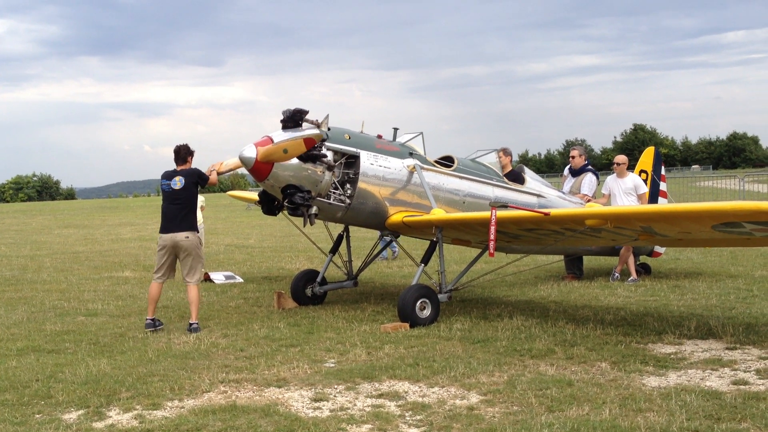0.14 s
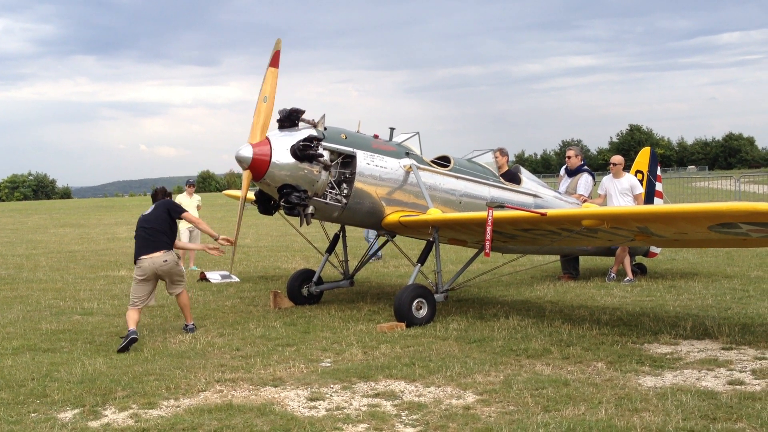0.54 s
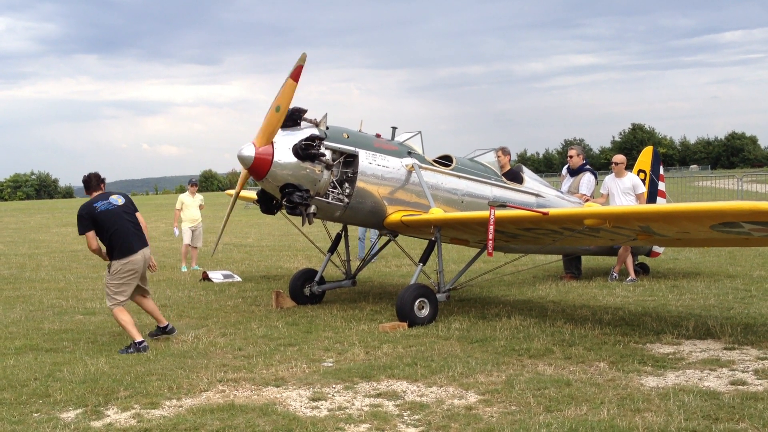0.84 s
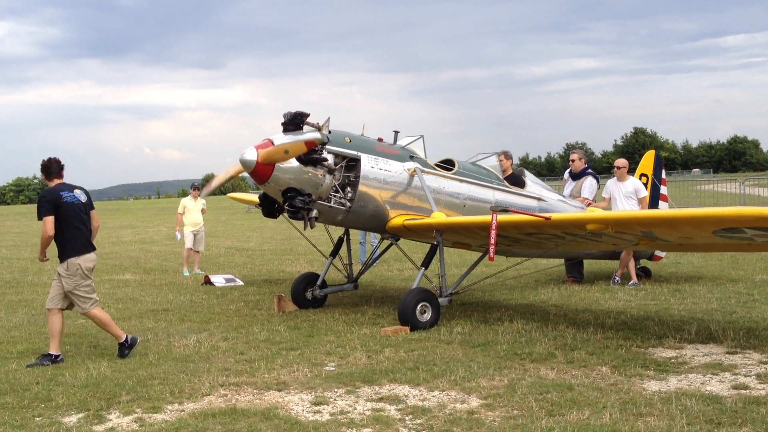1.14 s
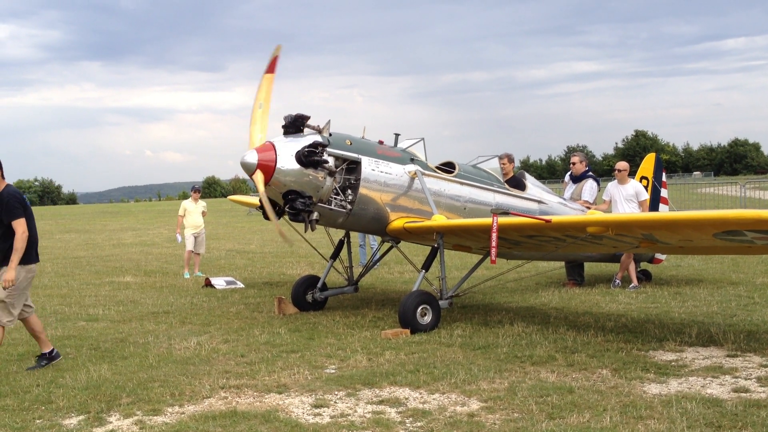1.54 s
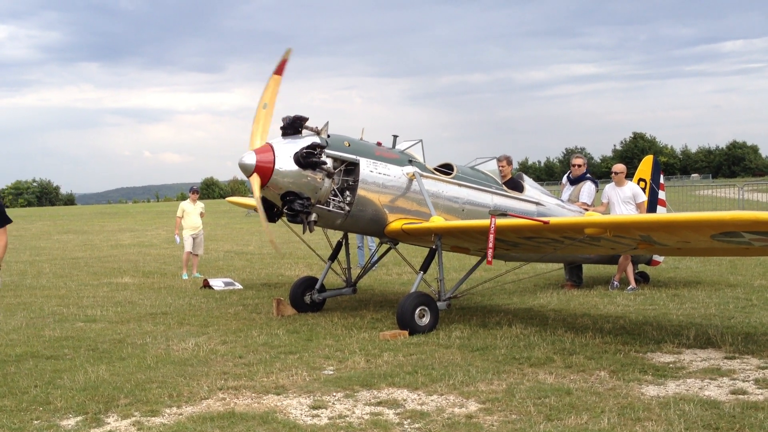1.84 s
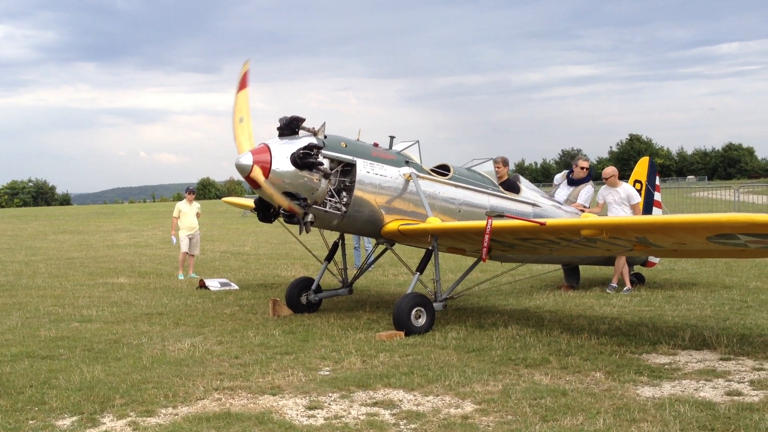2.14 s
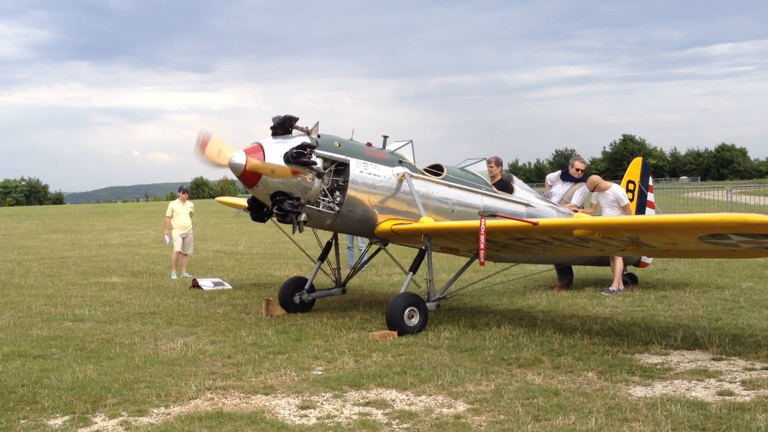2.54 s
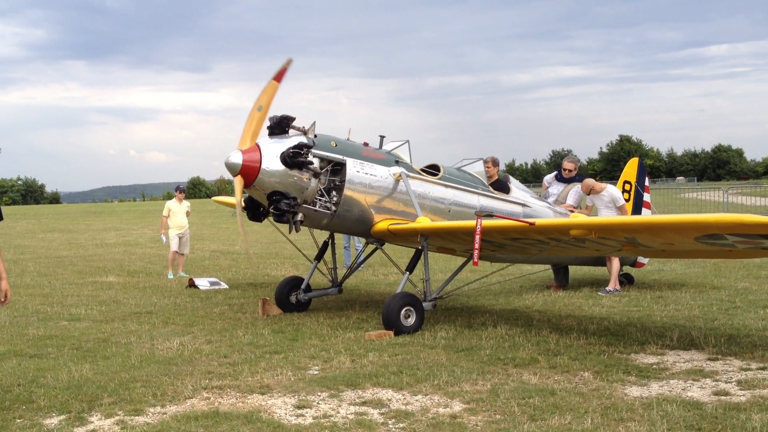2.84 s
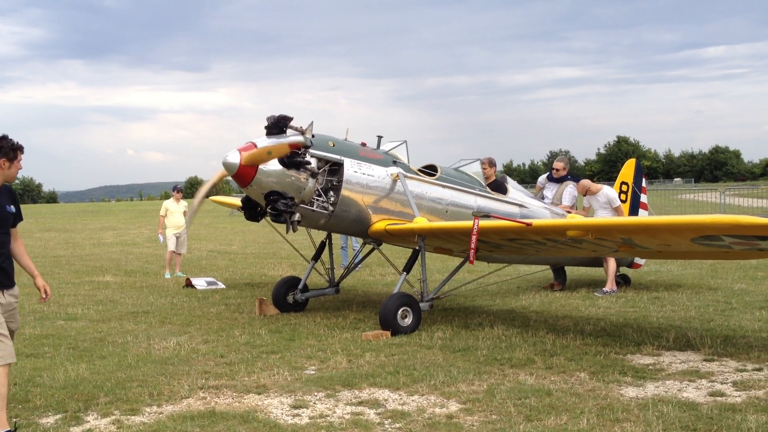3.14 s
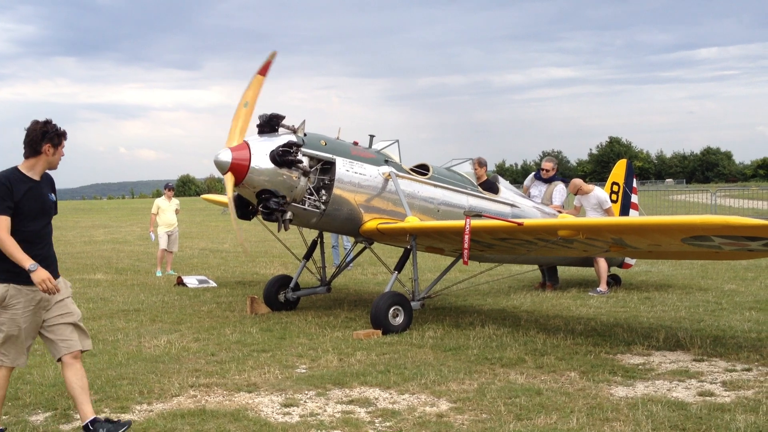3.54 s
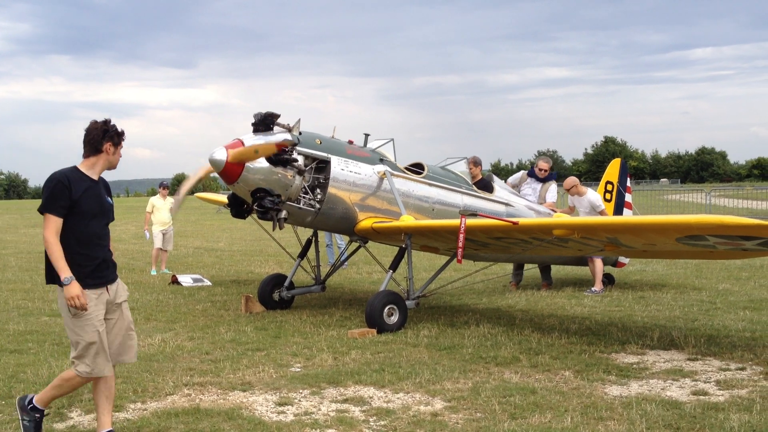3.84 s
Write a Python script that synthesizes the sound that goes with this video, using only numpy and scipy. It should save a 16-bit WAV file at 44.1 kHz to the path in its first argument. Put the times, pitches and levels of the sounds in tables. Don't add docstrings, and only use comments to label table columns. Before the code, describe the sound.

A small radial aircraft engine is hand-swung, clanks, catches unevenly and settles into a hissy popping idle

```python
import sys
import numpy as np
from scipy import signal
from scipy.fft import rfft, irfft
from scipy.io import wavfile
from scipy.ndimage import uniform_filter1d

SR = 44100
rng = np.random.default_rng(int(sys.argv[2]) if len(sys.argv) > 2 else 0)


def invert_db(x):
    u = np.asarray(x, float) / 20
    return 10 ** u


def store_pcm(level_fs):
    pcm = np.round(np.clip(level_fs, -1, 1) * 32767).astype(np.int16)
    wavfile.write(sys.argv[1], SR, np.atleast_2d(pcm).T)


N = 176400

# [f/Hz, density/dB]
FIELD_SPECTRUM = [(24, -57), (40, -23), (162, -4), (255, -5.5), (319, -10), (890, -26), (10100, -40),
                  (14700, -41), (15800, -48)]
# [t/s, level/dB, f/Hz, swell/s]
THUDS = [(0.052, -52, 162, 0.013), (0.102, -50.5, 248, 0.0078), (0.166, -43, 232, 0.0059),
         (0.194, -46, 143, 0.01), (.205, -45, 252, 0.0081), (0.279, -53, 163, 0.014),
         (.31, -51.5, 245, 0.011), (.34, -45, 162, 0.0073), (.38, -49, 150, 0.0067),
         (0.476, -41, 152, 0.0055), (.56, -53, 258, 0.01), (0.594, -54, 137, 0.011),
         (.81, -52.5, 157, 0.013), (1.061, -46.5, 101, 0.043), (1.249, -22, 176, 0.0033)]
RATTLE_S = (.5, .7, .9, .96, 1.08)
RATTLE_DB = (-62, -57, -56.5, -50, -36.5)
# [t/s, length/s, level/dB, tilt/dB per
WHEEZES = [(0.494, 0.025, -53, 3), (0.609, 0.047, -55, -5), (0.63, 0.042, -57, 3), (.727, 0.0074, -55, -2),
           (0.68, 0.054, -54.5, -4), (0.81, 0.042, -54.5, -5), (0.828, 0.027, -48, 3.5),
           (0.862, 0.069, -60, -1), (0.909, 0.048, -37.5, -0.5), (0.949, 0.05, -43.5, -6),
           (0.92, .008, -39, -5), (1.028, 0.011, -48, -7), (.773, .012, -58, -6), (.87, 0.0079, -55, -8),
           (0.95, .008, -50, -8), (1.211, 0.029, -31, -5), (1.149, 0.026, -23, 0.5), (1.012, .04, -62, 0)]
# [t/s, level/dB, f/Hz, t60/s]
CLANKS = [(.5, -46.5, 570, 0.12), (.559, -45, 520, 0.096), (.615, -43, 570, 0.072),
          (.686, -30.5, 505, 0.094), (.727, -47, 620, 0.065), (.775, -43, 570, 0.055),
          (.845, -46, 640, .08), (.915, -30, 1130, 0.062), (.918, -33, 2100, 0.11),
          (.922, -38, 4210, 0.066), (.7, -42, 516, .09), (.69, -42, 760, 0.055), (.685, -44, 1100, .05),
          (1.03, -42, 1000, .05), (1.263, -9, 2250, .045), (1.08, -16, 5100, 0.063),
          (1.16, -18, 1710, 0.06), (1.466, -18, 4300, 0.034), (1.85, -19, 660, 0.072),
          (.953, -33, 598, 0.095), (.985, -28, 577, 0.042), (1.031, -33, 620, 0.052),
          (1.056, -30, 245, 0.12)]
# times [t/s], pitches [f/Hz] and levels [level/dB]
SQUEAK_S = (.53, .6, .675)
SQUEAK_HZ = (4300, 7350, 7400)
SQUEAK_DB = (-82, -65, -62)
# [t/s, peak level/dB, whistle f/Hz, extra tilt/dB per octave, stretch/1]
CATCH = [(1.0766, -3.5, 1155, 2, 0.97), (1.1549, -7.5, 1110, 0.5, 0.97), (1.2204, -7, 4080, 0.8, 0.97),
         (1.262, -4, 6680.0, -0.5, 0.94), (1.3159, -10, 2200.0, -0.2, 0.97), (1.3553, -8, 2060, -0.1, 0.97),
         (1.3935, -15.5, 2220, 0.3, 1.0), (1.4371, -17.5, 7670.0, -0.5, 0.93),
         (1.4683, -6, 2160, 1.1, 0.97), (1.506, -11.5, 1640.0, 2, 1.0), (1.5388, -8, 7700, -0.1, 0.96),
         (1.5703, -15.5, 4540.0, -1.5, 1.0), (1.6061, -19, 4170, 1.2, 0.88), (1.633, -5, 2230, 1, 0.96),
         (1.6677, -12, 7000, -0.5, 0.99), (1.699, -4.5, 1050, -1.3, 0.87), (1.725, -22, 2250, 3, 1.0),
         (1.7608, -27, 2150, 4, 1.0), (1.7874, -5, 6400, -0.5, 0.96), (1.8196, -20, 1230.0, -3, 0.88),
         (1.8488, -5.5, 7150, 0, 0.97), (1.8791, -24, 1820, -3, 1.0), (1.9145, -19, 3230.0, -4, 0.95)]
IDLE_S = [1.937, 2.229, 2.517, 2.801, 3.081, 3.360, 3.640, 3.921, 4.202]
# [t/s, peak level/dB, whistle f/Hz, extra tilt/dB per octave]
NEAR_STACKS = [(1.9359, -5.5, 4080, 0.2), (1.9974, -11, 8290.0, -2.8), (2.0852, -7.5, 4480, 0.2),
               (2.1442, -9, 2070, 0), (2.2285, -8, 6450, -1), (2.2903, -10, 2810, -1),
               (2.374, -7, 6740, 0.2), (2.4325, -10.5, 4390.0, -0.6), (2.516, -7.5, 4250, -0.5),
               (2.577, -7.5, 6300, -0.8), (2.6601, -5, 1040, -0.0), (2.7181, -9, 3970, -2.2),
               (2.801, -7, 5770.0, -1), (2.8595, -11, 4040, -2), (2.9406, -8, 3790, -1.3),
               (2.9979, -11, 7490.0, -2), (3.0811, -8, 2366, -1.5), (3.1385, -9.5, 4200, 0.8),
               (3.2194, -7.5, 6570, -1.7), (3.2776, -11.5, 6360, -2.5), (3.36, -9.5, 6920, -1.8),
               (3.4182, -8.5, 4300, -0.5), (3.5004, -7, 4370, 0.8), (3.5573, -10, 4160, -2.2),
               (3.6394, -9, 4710, 2), (3.698, -10.5, 6500.0, 0.5), (3.7785, -7, 7620.0, -0.2),
               (3.8406, -7.5, 6570, -0.8), (3.92, -5, 6750, -0.5), (3.9783, -7, 8380.0, -2.7)]
# [place in cycle/0-1, puff level/dB, puff tilt/dB per octave]
CYLINDERS = [
    (0., -7, 1.8),
    (.213, -19, 1.2),
    (0.414, -8, 1.7),
    (.605, -27, 0.6),
    (.825, -29.5, -1),
]
# [lag/s, level/dB, f/Hz, swell/s]
PIPES = [
    [(-.010, -8, 273, 0.0087), (0.001, -6.5, 224.5, 0.0077)],
    [(-0.0166, -12, 125.5, 0.011), (-.015, -2.5, 176, .012), (.0015, -4.5, 251, 0.0031),
     (0.012, -1, 613, 0.0016), (0.0032, -12, 560, 0.0011)],
    [(-.006, -3, 251.6, 0.0049), (0.01177, -9, 132.3, 0.0086), (.008, -2.5, 210, 0.0018),
     (-0.0071, -10, 661, 0.0044)],
    [(-.010, -6, 176, 0.011), (.007, -9.5, 226.5, 0.006)],
    [(-.004, -5, 242, 0.0021), (0.0023, -7.5, 133, 0.0045), (-0.0032, -17, 603, 0.0027)],
]
# [t/s, level/dB]
LOAD = [
    (1.06, -43.5),
    (1.18, -35.5),
    (1.26, -35.5),
    (1.3, -40.5),
    (1.7, -34),
    (3.72, -28),
    (4.0, -29),
]
# [f/Hz, density/dB]
PUFF_SPECTRUM = [(130, -45), (300, -16.5), (800, -13.5), (1900, -2), (5200, -3), (8200, -4.5), (9500, -12),
                 (14000, -12.5)]
# [f/Hz, width/Hz, level/dB]
STACK = [(2226, 61, 6), (4225, 167, 6), (6650, 660, 4), (1130, 180, 9)]
# [f/Hz, density/dB]
HISS_SPECTRUM = [(700, -15.5), (1500, -4), (2500, 0.5), (5000, -2), (7800, -2), (9500, -8.5), (14000, -14),
                 (16000, -4)]
# [f/Hz, width/Hz, level/dB]
COWL = [(590, 250, -2.5), (1112, 500, -2), (1723, 380, -8), (456, 204, -12)]

PATCH_DB = 2.2
IDLE_GAP_S = .028


def evened(x):
    return x / np.sqrt(np.mean(x ** 2) + 1e-20)


def add(mix, s, sound):
    part = mix[round(s * SR):][:len(sound)]
    part += sound[:len(part)]


def colour(x, points, tilt_db=0, peaks=(), patch_db=0):
    hz = np.fft.rfftfreq(len(x), 1 / SR) + 1
    f, level = np.transpose(points)
    db = np.interp(np.log(hz), np.log(f), level)
    db = db + tilt_db * np.log2(np.clip(hz, 300, None) / 4000)
    db = db + sum(up * np.exp(-((hz - mid) / width) ** 2) for mid, width, up in peaks)
    patches = uniform_filter1d(uniform_filter1d(x[::-1][:len(hz)], size=30), size=30)
    db = db + patch_db * evened(patches)
    return evened(irfft(rfft(x) * invert_db(db), len(x)))


def patchy(x):
    z = signal.stft(x, nperseg=256)[2]
    patches = uniform_filter1d(rng.standard_normal(z.shape[::-1]), size=4, axis=0)
    patches = uniform_filter1d(patches, size=7, axis=1)
    flicker = invert_db(3.2 * evened(patches).T)
    return evened(signal.istft(z * flicker, nperseg=256)[1][:len(x)])


def resonate(x, hz, width):
    pole = np.exp((2j * np.pi * hz - np.pi * width) / SR)
    return evened(signal.lfilter([1], np.poly([pole, pole]), x).real)


def ring(hz, t60, rise_s):
    t = np.arange(6000) / SR
    return np.sin(2 * np.pi * hz * t) * invert_db(-60 * t / t60) * (1 - np.exp(-t / rise_s))


def swell(hz, peak_s):
    t = np.arange(6000) / SR
    return np.sin(2 * np.pi * hz * t) * t / peak_s * np.exp(1 - t / peak_s)


def field():
    out = invert_db(-57.5) * colour(rng.standard_normal(N), FIELD_SPECTRUM, 0, [(300, 90, 2.1)])
    for s, db, hz, peak_s in THUDS:
        add(out, s, invert_db(db) * swell(hz, peak_s))
    return out


def rattle():
    level_db = np.interp(np.arange(N) / SR, RATTLE_S, RATTLE_DB, left=-99, right=-99)
    struck = rng.random(N) < 1200 / SR
    force = invert_db(1.5 * np.minimum(rng.exponential(1, N), 2))
    ticks = struck * force * rng.standard_normal(N)
    body = [(617, 200, -4.5), (1430, 660, -9.5), (4030, 2100, -22), (2330, 2300, -14)]  # f/Hz, width/Hz, level/dB
    return invert_db(level_db) * sum(invert_db(db) * resonate(np.gradient(ticks), hz, width) for hz, width, db in body)


def swing():
    out = np.zeros(N)
    t = np.arange(8192) / SR
    for s, length, db, tilt_db in WHEEZES:
        shape = np.exp(-(t / length) ** 3) + 0.21 * np.exp(-t / length)
        shape = shape * np.minimum(t / (.12 * length), 1)
        shape = shape * invert_db(1.8 * evened(uniform_filter1d(rng.standard_normal(len(t)), 200)))
        peaks = STACK[:2] + STACK[3:]
        air = colour(rng.standard_normal(len(t)), PUFF_SPECTRUM, tilt_db, peaks, PATCH_DB)
        add(out, s, invert_db(db) * shape * air)
    for s, db, hz, t60 in CLANKS:
        knock = ring(hz, t60, 0.0039)
        knock = knock + 0.44 * ring(hz * 1.17, t60, 0.0013)
        knock = knock + 0.33 * ring(hz * 1.8, 0.53 * t60, 0.00081)
        add(out, s, invert_db(db) * knock)
    t = np.arange(SQUEAK_S[0], SQUEAK_S[-1], 1 / SR)
    wobble_hz = 1600 * uniform_filter1d(rng.standard_normal(len(t)), 60)
    hz = np.interp(t, SQUEAK_S, SQUEAK_HZ) + wobble_hz
    level = invert_db(np.interp(t, SQUEAK_S, SQUEAK_DB)) * np.sqrt(np.hanning(len(t)))
    add(out, t[0], level * np.sin(2 * np.pi * np.cumsum(hz) / SR))
    return out


def load_db(s):
    t, db = np.transpose(LOAD)
    return np.interp(s, t, db, left=-90)


def firings():
    first_cylinder = 2
    rows = []
    for k, (s, *puff) in enumerate(CATCH):
        rows.append((s, (k + first_cylinder) % len(PIPES), s, *puff))
    marks, near = 2 * np.arange(len(IDLE_S)), iter(NEAR_STACKS)
    luck = rng.standard_normal((100, 2))
    for cycle in range(len(NEAR_STACKS) // 2):
        for k, (place, db, _) in enumerate(CYLINDERS):
            late, loud = luck[len(PIPES) * cycle + k]
            s = np.interp(cycle + place, marks, IDLE_S)
            if k in (0, 2):
                puff = (*next(near), 1)
            else:
                puff = (s + 0.00065 * late, db + 5.8 * np.tanh(loud), STACK[k // 2][0], 0, 1)
            rows.append((s, k) + puff)
    gaps = np.diff([row[0] for row in rows])
    return [row + (gap,) for row, gap in zip(rows, gaps) if row[0] < N / SR]


def roar(rows):
    beats = np.zeros(N)
    beats[[round(row[0] * SR) for row in rows]] = 1
    throb = signal.oaconvolve(beats, np.exp(-np.arange(4000) / (0.022 * SR)))[:N]
    level_db = load_db(np.arange(N) / SR)
    running = uniform_filter1d(np.cumsum(beats) > 0, 900, output=float)

    rumble = invert_db(level_db - 13) * resonate(rng.standard_normal(N), 190, 110)
    cowl = sum(invert_db(db) * resonate(rng.standard_normal(N), hz, width) for hz, width, db in COWL)
    cowl = cowl * invert_db(level_db - 2.5) * (0.57 + 0.83 * throb)
    hiss = patchy(colour(rng.standard_normal(N), HISS_SPECTRUM, 0, STACK[2:3]))
    crackle = invert_db(1.5 * evened(uniform_filter1d(rng.standard_normal(N), 150)))
    hiss = hiss * crackle * invert_db(0.72 * level_db - 12) * running * (0.81 + 1.72 * throb)
    return rumble + cowl + hiss


def thumps(rows):
    out, luck = np.zeros(N), rng.standard_normal((len(rows), 8, 2))
    for (s, k, *_), chance in zip(rows, luck):
        for (lag, db, hz, peak_s), (a, b) in zip(PIPES[k], chance):
            middle = np.exp(-((hz - 250) / 55) ** 2)
            cold_db = 0.45 * (load_db(s) - LOAD[-1][1]) * middle
            level = invert_db(load_db(s) + cold_db + db + 10.5 + 1.4 * a)
            add(out, s + lag + .00025 * b, level * swell(hz * (1 + .01 * b), peak_s))
    return out


def puffs(rows):
    rise, fall, tail, tail_db = .3, .13, .34, -12
    out, t = np.zeros(N), np.arange(4096) / SR
    air = rng.standard_normal((len(rows), 2, len(t)))
    luck = rng.standard_normal((len(rows), len(STACK), 2))
    for (_, k, s, db, whistle_hz, tilt_db, stretch, gap), (noise, rag), chance in zip(rows, air, luck):
        span = stretch * (.003 + .72 * gap)
        octaves = np.log2(gap / IDLE_GAP_S)
        slow = np.clip(octaves, 0, 2)
        u = t / span - rise
        opening = np.exp(-abs(2.1 * u / rise) ** 1.6)
        closing = np.exp(-abs(u / fall / 1.33) ** (1.16 + .5 * slow))
        lingering = invert_db(tail_db - 12 * slow) * (np.exp(-u / tail) - np.exp(-u / fall))
        shape = np.where(u < 0, opening, closing + lingering)
        shape = shape * invert_db(1.03 * evened(uniform_filter1d(rag, 40)))

        peaks = []
        for (hz, width, up), (a, b) in zip(STACK, chance):
            peaks.append((hz * (1 + .012 * a), width, up + 0.9 * np.tanh(b)))
        peaks.append((whistle_hz, 110, 8))
        peaks.append((1100, 350, 0.62 * octaves))
        peaks.append((13000, 4500, 1.8 * octaves + 0.084 * (db + 9.5)))
        jet = colour(noise, PUFF_SPECTRUM, CYLINDERS[k][2] + tilt_db, peaks, PATCH_DB)
        add(out, s - .62 * rise * span, invert_db(db - 7.0) * shape * jet)
    return out


def scene():
    rows = firings()
    near = rattle() + swing() + puffs(rows)
    echo = np.zeros(1500)
    echo[[0, 420, 1100]] = 1, .14, .11
    near = signal.oaconvolve(near, echo)[:N]
    return (field() + roar(rows) + thumps(rows) + near)[None]


def top_cut(x):
    return signal.sosfilt(signal.butter(12, 15600, fs=SR, output="sos"), x)


def record(dry):
    bass_cut = signal.butter(5, 67, "high", fs=SR, output="sos")
    band_limit = signal.firwin(401, 15240, window=("kaiser", 11), fs=SR)
    cut = signal.sosfilt(bass_cut, dry)
    mix = signal.oaconvolve(cut, band_limit[None], "same")
    return top_cut(mix)


dry = scene()
out = record(dry)
store_pcm(out)
```